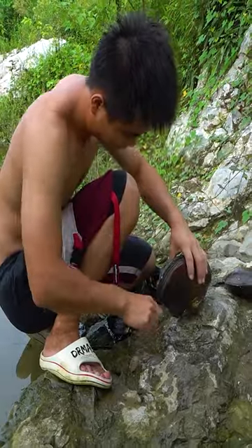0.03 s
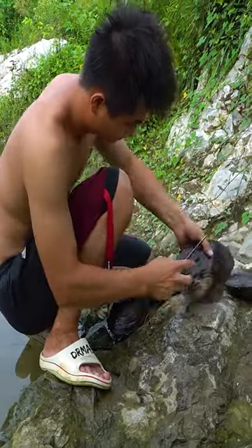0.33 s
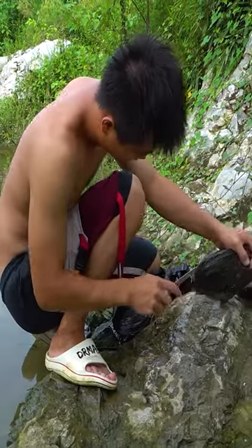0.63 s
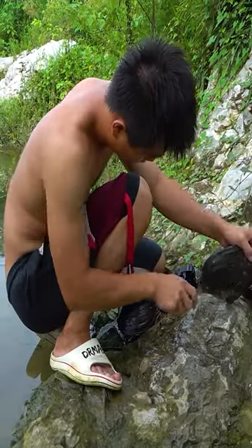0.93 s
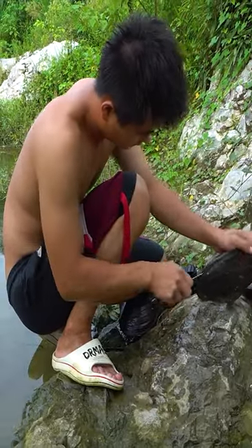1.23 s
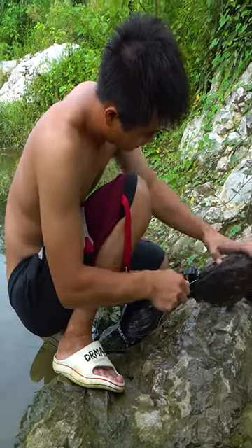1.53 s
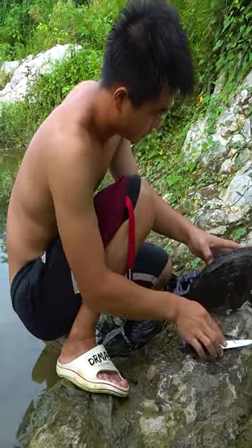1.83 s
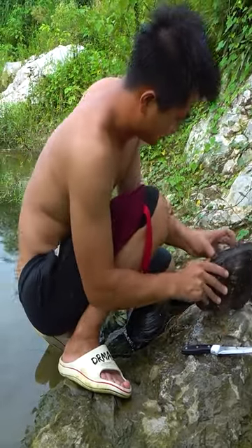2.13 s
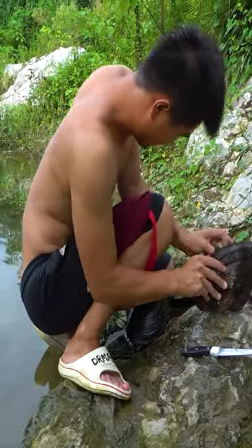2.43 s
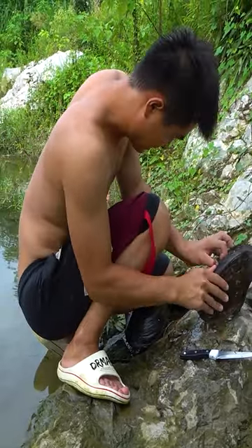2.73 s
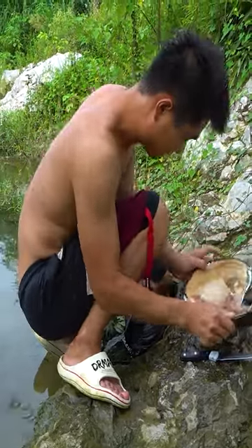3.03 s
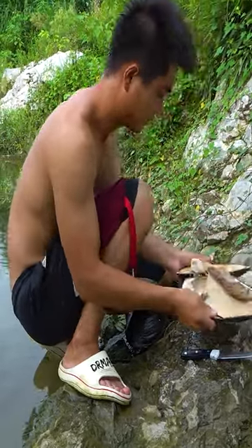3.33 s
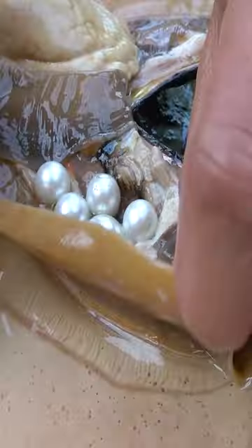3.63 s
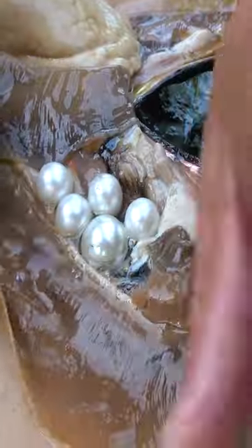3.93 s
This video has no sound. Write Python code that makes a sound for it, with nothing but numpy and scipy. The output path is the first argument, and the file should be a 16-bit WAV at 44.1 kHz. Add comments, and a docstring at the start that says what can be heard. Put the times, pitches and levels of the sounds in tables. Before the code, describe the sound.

A large mussel shell knocks hollowly on rock while a knife clicks and levers in its seam. The knife is put down, then the shell splits with a sharp crack and wet pops. Faint water and a bird sound behind.

```python
"""A big freshwater mussel is opened on a rock beside a pond. The closed shell knocks on the stone, a
knife levers in the seam and is laid down, then the halves part with a splintering crack and wet pops.
Each contact rings the modes of shell or knife and crushes grit; rocks and bank scatter the sound.
Behind it water hisses, laps and drips, a small bird sings one phrase twice and an insect chirps."""
import sys
import numpy as np
from scipy import signal
from scipy.fft import rfft, irfft
from scipy.io import wavfile
from scipy.ndimage import uniform_filter1d

SR = 44100
rng = np.random.default_rng(int(sys.argv[2]) if len(sys.argv) > 2 else 0)


def wav_out(sig):
    """Save sig, one row per channel (or a flat mono array), as 16-bit PCM at SR to the path in sys.argv[1]."""
    wavfile.write(sys.argv[1], SR, np.round(np.clip(np.atleast_2d(sig).T, -1, 1) * 32767).astype(np.int16))


N = 176400
TIME = np.arange(N) / SR


def from_db(db):
    """Decibels to gain."""
    return 10 ** (np.asarray(db) / 20)


def unit_rms(x):
    """Scale to rms 1."""
    return x / np.sqrt(np.mean(x ** 2) + 1e-20)


def decay(t, t60_s):
    """Exponential fall of 60 dB in t60_s."""
    return np.exp(-np.log(1000) * t / t60_s)


def add(out, start_s, sound, pan_db=0):
    """Mix a mono sound into a stereo track; pan is left minus right."""
    i = max(int(start_s * SR), 0)
    part = sound[:N - i]
    out[:, i:i + len(part)] += from_db([[pan_db / 2], [-pan_db / 2]]) * part


def stereo(mid, side, width):
    """Left and right from mid and side."""
    return np.array([mid + width * side, mid - width * side])


def colour(points):
    """Gain per FFT bin from (Hz, dB) points."""
    hz, db = np.transpose(points)
    bin_hz = np.maximum(np.arange(N // 2 + 1) * SR / N, 1)
    return from_db(np.interp(np.log(bin_hz), np.log(hz), db))


def noise(spectrum):
    """Steady coloured noise, rms 1."""
    return unit_rms(irfft(rfft(rng.standard_normal(N)) * colour(spectrum), N))


def band_swell(source, length_s, band_hz):
    """One band of a source, rising and falling once."""
    u = np.linspace(0, 1, int(length_s * SR))
    band = signal.sosfilt(signal.butter(2, band_hz, "band", fs=SR, output="sos"), source)
    return np.sin(np.pi * u) * unit_rms(band)[-len(u):]


def glides(rows, offset_s=0):
    """Soft-edged tones bending through three pitches; an optional rasp makes the pitch shiver."""
    out = np.zeros((2, N))
    for start_s, length_s, first_hz, mid_hz, last_hz, db, *rasp_hz in rows:
        u = np.linspace(0, 1, int(length_s * SR))
        shiver = unit_rms(uniform_filter1d(rng.standard_normal(N // 40), size=30))[:len(u)]
        bend_hz = np.polyval(np.polyfit([0, .5, 1], [first_hz, mid_hz, last_hz], 2), u)
        phase = 2 * np.pi * np.cumsum(bend_hz + sum(rasp_hz) * shiver) / SR
        add(out, offset_s + start_s, from_db(db) * np.sin(np.pi * u) ** 2 * np.sin(phase))
    return out


def echoes(x, db, t60_s, delay_s=0.003964):
    """Dense reflections from rough stone, dying smoothly."""
    t = TIME[:N // 8]
    envelope = decay(t, t60_s) * (t > delay_s)
    scatter = stereo(*rng.standard_normal((2, len(t))), width=0.23)
    response = scatter * envelope / np.sqrt(np.sum(envelope ** 2))
    return from_db(db) * signal.fftconvolve(x, response, axes=1)[:, :N]


# Stereo width of the hiss. Each row: frequency in Hz, side gain in dB ahead of the width factor.
HISS_SIDE = [(60, -21), (110, -24.5), (380, -8.5), (700, -4), (1300, -11.5), (2400, -9), (4400, -13.5),
             (8000, -29.5), (15000, -26)]
# Lean of the hiss. Each row: frequency in Hz, pan in dB.
HISS_PAN = [(60, -0.5), (200, 2.5), (700, -2.5), (1290, 6.5), (2380, 3.5), (4400, -1.5), (15000, 1)]


def hiss(spectrum, bands=12, flicker_db=2.5, step_s=.03):
    """Stereo noise whose bands flicker independently, the bass least."""
    mid = rfft(noise(spectrum))
    side = rfft(noise(spectrum)) * colour(HISS_SIDE)
    lean = np.sqrt(colour(HISS_PAN))
    bins = stereo(mid, side, width=0.76) * np.array([lean, 1 / lean])
    band_position = np.linspace(0, 1, N // 2 + 1) ** .5 * bands
    steps_s = np.arange(N // 100) * step_s
    out = 0
    for k in range(bands):
        flicker = np.interp(TIME, steps_s, rng.standard_normal(len(steps_s)))
        band = irfft(bins * np.maximum(1 - abs(band_position - k), 0), N)
        out = out + from_db(flicker_db * min(k / 2, 1) * flicker) * band
    return out


# Water spectra, before and after 3.6 s. Each row: frequency in Hz, relative density in dB.
WATER_SPECTRUM = [(18, -57), (30, -31), (106, -5), (245, -7.5), (311, -4), (461, -11.5), (760, -12),
                  (937, -7.5), (1250, -11.5), (2290, 3), (2750, -8), (3140, -3.5), (3490, -6.5),
                  (4780, -6.5), (6550, -13), (9220, -13), (12600, -20), (14800, -18), (16000, -21)]
LATE_WATER_SPECTRUM = [(30, -22), (70, -19), (130, 0.5), (300, -2), (450, -9), (700, -13.5), (1300, -9.5),
                       (1600, -1.5), (2100, 2), (2750, -5.5), (3500, -3.5), (5000, -12.5), (5600, -16),
                       (7500, -8.5), (10000, -13.5), (13000, -15), (16000, -21)]
# Water loudness. Each row: time in seconds, gain in dB.
WATER_GAIN = [(0, -50.5), (.7, -51.5), (1.4, -50.5), (2.2, -51.5), (2.9, -50), (3.1, -50), (3.55, -51.5),
              (3.62, -50.5), (4, -50)]


def running_water(switch_s=3.6):
    """Distant water hisses; its colour changes at 3.6 s."""
    gain = from_db(np.interp(TIME, *np.transpose(WATER_GAIN)))
    return gain * np.where(TIME < switch_s, hiss(WATER_SPECTRUM), hiss(LATE_WATER_SPECTRUM))


# Each row: start in seconds, length in seconds, level in dB, low and high band edge in Hz.
LAPS = [(1.471, 0.21, -54, 219, 412), (2.474, .22, -65, 490, 570), (2.681, .24, -62.5, 416, 480)]


def laps():
    """Water laps at the bank in low swells of narrow-band noise."""
    out = np.zeros((2, N))
    for start_s, length_s, db, *band_hz in LAPS:
        add(out, start_s, from_db(db) * band_swell(rng.standard_normal(N), length_s, band_hz))
    return out


# Each row: start in seconds, length in seconds, first, middle and last pitch in Hz, level in dB.
DRIPS = [(1.488, 0.025, 360, 352, 335, -47), (2.992, 0.024, 826, 570, 444, -39.5),
         (3.048, 0.012, 1080, 1126, 1150, -43.5), (3.115, 0.014, 1410, 1430, 1450, -49.5),
         (3.155, 0.03, 1400, 1430, 1430, -47)]


def drips():
    """Drips and bubbles ring as short gliding tones."""
    return glides(DRIPS)


# Each row: start in seconds, level in dB.
CHIRPS = [(3.7275, -51), (3.7395, -42), (3.7512, -38), (3.7637, -38)]


def insect(length_s=.009, pitches_hz=(15800, 14600, 13700)):
    """A quick, swelling run of thin falling chirps, smeared by the rocks."""
    run = glides([(start_s, length_s, *pitches_hz, db) for start_s, db in CHIRPS])
    return run + echoes(run, db=-7, t60_s=.09)


# Each row: start of a phrase in seconds.
PHRASES = [(1.046,), (2.494,)]
# Each row: offset and length in seconds, first, middle and last pitch in Hz, level in dB, rasp in Hz.
BIRD_NOTES = [(-.004, 0.049, 4850, 5046, 4750, -41.5, 30), (.056, 0.024, 4950, 4900, 5500, -43.5, 120),
              (.07, .036, 5600, 6600, 6240, -49, 400), (.11, .028, 4800, 4560, 4330, -46.5, 50)]


def bird():
    """A small bird repeats four raspy whistled notes, with a short echo."""
    song = sum(glides(BIRD_NOTES, start_s) for start_s, in PHRASES)
    return song + echoes(song, db=-11.5, t60_s=.14)


# Crackle loudness. Each row: time in seconds, level in dB.
CRACKLE_LEVEL = [(0, -61.5), (.9, -59.5), (1.5, -64), (2.04, -59.5), (2.3, -63), (2.93, -62), (2.99, -45.5),
                 (3.07, -57), (3.15, -63.5), (3.32, -56.5), (3.5, -60.5), (4, -59.5)]


def wet_crackle(bursts_per_s=2200, size_spread_db=2, t60_cycles=22, range_hz=(1880, 11930), pitches=16):
    """Tiny water films on flesh and fingers burst at random, each ringing briefly."""
    sizes = from_db(size_spread_db * np.minimum(rng.exponential(1, N), 5)) * rng.choice([-1, 1], N)
    bursts = sizes * (rng.random(N) < bursts_per_s / SR)
    pitch_index = rng.integers(0, pitches, N)
    out = 0
    for k, hz in enumerate(np.geomspace(*range_hz, pitches)):
        radius, angle = decay(1 / SR, t60_cycles / hz), 2 * np.pi * hz / SR
        resonator = [np.sin(angle), 0, -np.sin(angle)], [1, -2 * radius * np.cos(angle), radius ** 2]
        out = out + signal.lfilter(*resonator, bursts * (pitch_index == k) + 1e-18)
    return from_db(np.interp(TIME, *np.transpose(CRACKLE_LEVEL))) * unit_rms(out)


# Each row: start in seconds, length in seconds, level in dB, low and high band edge in Hz.
SCRAPES = [(.875, .06, -57, 13000, 15800), (1.179, 0.033, -47.5, 6100, 8000),
           (1.66, 0.011, -50.5, 7600, 8300), (2.165, .05, -59, 11000, 15500),
           (2.365, .07, -60, 9500, 15500), (2.638, .03, -56, 11000, 14000),
           (0.397, 0.0059, -43, 10500, 15800)]


def scrapes(slips_per_s=570):
    """Short strokes over fine grit give a bright spray of tiny slips."""
    out, size = np.zeros((2, N)), N // 10
    for start_s, length_s, db, *band_hz in SCRAPES:
        slips = rng.choice([-1, 1], size) * (rng.random(size) < slips_per_s / SR)
        add(out, start_s, from_db(db) * band_swell(slips + 1e-18, length_s, band_hz))
    return out


# Wet pops and dull taps. Each row: start in seconds, level in dB, pitch in Hz, t60 in cycles, pan in dB.
POPS = [(1.3993, -26, 840, 2.9, 0), (1.798, -31, 1500, 5.6, 3), (1.7992, -26, 760, 4.9, 2),
        (2.7542, -30, 2450, 29, 1), (2.7552, -28, 8400, 52, 1), (3.5114, -9, 3930, 7.3, 1),
        (3.5127, -10.5, 2190, 12.3, 3.5), (3.5125, -24, 950, 5.4, 0), (3.5748, -20.5, 3080, 18, -4),
        (3.5747, -32, 1190, 4, 0.5)]


def flesh_pops(rise_cycles=0.77):
    """A small cavity swells into a few cycles and dies at once."""
    out, t = np.zeros((2, N)), TIME[:N // 40]
    for start_s, db, hz, t60_cycles, pan_db in POPS:
        envelope = (1 - np.exp(-t * hz / rise_cycles)) * decay(t, t60_cycles / hz)
        add(out, start_s, from_db(db) * envelope / envelope.max() * np.sin(2 * np.pi * hz * t), pan_db)
    return out


def ring(t, modes, pitch_ratio=1, treble_db=0, treble_hz=3000, spread_db=2, detune=.012):
    """A struck body; mode strengths and treble tuning vary with the point of contact."""
    out = 0
    for k, (hz, db, t60_s) in enumerate(modes):
        strength, shift = rng.standard_normal(2)
        is_treble = hz > treble_hz
        gain = (-1) ** k * from_db(db + spread_db * strength + is_treble * treble_db)
        tuned_hz = hz * pitch_ratio * (1 + is_treble * detune * shift)
        out = out + gain * decay(t, t60_s) * np.sin(2 * np.pi * tuned_hz * t)
    return out


# Each row: frequency in Hz, relative density in dB.
GRIT_SPECTRUM = [(300, -26), (1000, -5.5), (2000, -2.5), (4000, -0.5), (6000, 1.5), (8500, 2.5),
                 (12000, -0.5), (16000, -2.5)]


def contacts(rows, modes, rise_s, clump_db=4, tail_db=-24):
    """Each contact rings the body and crushes grit, whose uneven grains break one after another."""
    out, t = np.zeros((2, N)), TIME[:N // 24]
    clumps = unit_rms(uniform_filter1d(rng.standard_normal(N), size=16))
    grit = unit_rms(noise(GRIT_SPECTRUM) * from_db(clump_db * np.tanh(clumps)))
    crush = .5 * (decay(t, t60_s=0.013) + from_db(tail_db) * decay(t, t60_s=0.058))
    attack = 1 - np.exp(-t / rise_s)
    for start_s, ring_db, grit_db, pan_db, *tone in rows:
        body = from_db(ring_db) * ring(t, modes, *tone)
        crunch = from_db(grit_db) * crush * np.roll(grit, -int(start_s * SR))[:len(t)]
        add(out, start_s, (body + crunch) * attack, pan_db)
    return out


# Closed shell. Each row: frequency in Hz, gain in dB, t60 in seconds.
CLOSED_MODES = [(530, -15, 0.019), (734, -14, 0.0046), (950, .5, 0.027), (1260, -27, 0.005),
                (1650, -13, 0.013), (4100, -19, 0.021), (6060, -23, 0.018)]
# Each row: start in seconds, length in seconds, level in dB.
DRAGS = [(0.099, 0.11, -56), (.46, 0.14, -58), (0.737, 0.052, -54.5), (0.868, 0.073, -60.5),
         (1.012, 0.11, -58.5), (1.12, 0.034, -46.5), (1.174, 0.055, -48)]


def shell_drags(slips_per_s=1300):
    """Dense little slips on the stone keep the closed shell murmuring."""
    out, t = np.zeros((2, N)), TIME[:N // 40]
    body = sum(from_db(db) * np.sin(2 * np.pi * hz * t) * decay(t, t60) for hz, db, t60 in CLOSED_MODES)
    slips = rng.standard_normal(N) * (rng.random(N) < slips_per_s / SR)
    rub = unit_rms(signal.fftconvolve(slips, body)[:N])
    for start_s, length_s, db in DRAGS:
        u = np.linspace(0, 1, int(length_s * SR))
        add(out, start_s, from_db(db) * np.sin(np.pi * u) * np.roll(rub, -int(start_s * SR))[:len(u)])
    return out


# Each row: start in seconds, ring gain, grit gain and pan in dB, pitch ratio.
KNOCKS = [(.1315, -28, -26, 3, 1.02), (.139, -32, -52, 0, 1.04), (.1502, -25, -25.5, 0, 0.98),
          (.1772, -29.5, -48, 0, 0.98), (.2135, -27, -36, 1.5, 1.05), (.225, -31.5, -36, -2, 0.96),
          (.3995, -20.5, -34, 1.5, 0.99), (.4485, -22, -32, -2.5, 0.95), (.459, -33.5, -56, -6, 1),
          (.644, -44.5, -63, 8, 0.99), (.760, -42, -29.5, 1, 1.22), (.877, -38.5, -38, 0, 0.94),
          (.904, -37.5, -35, 3, 1.03), (1.017, -41, -57, 3, 1.08), (1.191, -41, -35, 4, 1.01),
          (1.2045, -40, -30.5, 0, 0.98)]


def shell_knocks():
    """The closed shell knocks on the rock and rings hollow."""
    return contacts(KNOCKS, CLOSED_MODES, rise_s=.00051)


# Each row: frequency in Hz, gain in dB, t60 in seconds.
KNIFE_MODES = [(1500, -21, 0.01), (2460, -14, 0.017), (3300, -14, 0.011), (3650, -10.5, 0.036),
               (4040, -7.5, 0.018), (4500, -8, 0.023), (5430, -11.5, 0.014), (6180, -6, 0.014),
               (10250, -12, 0.012), (13300, -15, .01), (14700, -16, 0.0087)]
# Each row: start in seconds, ring gain, grit gain and pan in dB.
KNIFE_CLICKS = [(.211, -28.5, -19, -2.5), (.214, -50, -27, 2), (1.8587, -23, -18, -2), (1.862, -54, -24, 0),
                (1.8685, -28, -37, -1), (1.8735, -37, -45, 4), (1.8977, -31, -27.5, -2.5),
                (1.9075, -36, -44, -1), (1.918, -30.5, -36, -4), (1.9235, -36, -42, 2),
                (1.928, -38, -48, -4), (1.944, -42, -55, -5), (1.9715, -40, -50, 0), (1.9775, -35, -47, -4)]


def knife_clicks():
    """The knife clicks on shell and stone, and bounces as it is laid down."""
    return contacts(KNIFE_CLICKS, KNIFE_MODES, rise_s=.0001)


def blade_ring(start_s=.212, db=-49, hz=3560, t60_s=0.28):
    """One thin steel mode rings on after the first click."""
    out, t = np.zeros((2, N)), TIME[:N // 16]
    add(out, start_s, from_db(db) * np.sin(2 * np.pi * hz * t) * decay(t, t60_s))
    return out


# Each row: start in seconds, length in seconds, first, middle and last pitch in Hz, level in dB.
SQUEAKS = [(1.2, 0.013, 6350, 6130, 5900, -42)]


def blade_squeak():
    """The blade squeaks in the seam with a falling pitch."""
    return glides(SQUEAKS)


# Each row: frequency in Hz, gain in dB, t60 in seconds.
SEAM_MODES = [(667, -13, 0.016), (1066, -5, 0.024), (1400, -11.5, 0.021), (1680, -6, 0.03),
              (1898, 0, 0.019), (2450, -6.5, 0.016), (4250, -23, .03), (6520, -14, 0.012)]
# Each row: start in seconds, ring gain, grit gain and pan in dB.
LEVERS = [(1.369, -37, -52, -2), (1.377, -32, -43, 6), (1.3825, -29, -56, 4), (1.393, -34, -40, 14),
          (1.3965, -25, -20.5, -4), (1.398, -19, -25, 1), (1.411, -37, -57, -2), (2.013, -37, -52, 3),
          (2.017, -27, -42, 2.5), (2.021, -44, -25, 1.5), (2.027, -26, -32, 0), (2.032, -29, -43, -1)]


def levering():
    """The blade levers in the seam and the hands work the rim."""
    return contacts(LEVERS, SEAM_MODES, rise_s=.001)


# Open halves. Each row: frequency in Hz, gain in dB, t60 in seconds.
OPEN_MODES = [(618, -24, 0.04), (935, -16, 0.031), (1150, -16.5, 0.017), (2314, -12.5, 0.022),
              (2500, -8, 0.048), (2690, -12, 0.022), (2860, -16, .025), (3370, -15, 0.015),
              (3550, -13, 0.027), (3760, -8, 0.021), (3990, -5, 0.016), (4180, -9, 0.016),
              (4750, -15.5, 0.028), (5550, -18, 0.01), (7400, -18.5, 0.019)]
# Each row: start in seconds, ring gain, grit gain and pan in dB, pitch ratio, treble ring gain in dB.
CRACKS = [(2.7541, -59, -28.5, 2.5, 1, 0), (2.9362, -27, -32, 0, 1.02, -14),
          (2.9457, -13, -16, 2.5, 0.98, -12), (2.949, -33, -10.5, -4, 0.98, 0),
          (2.9537, -24, -14.5, -1, 1.03, 2), (2.9594, -14.5, -11, -3.5, 0.98, 5),
          (2.9612, -11, -16, -4, 1, 5), (2.9685, -13, -26, 0, 1, 2), (2.9772, -28, -23, -4, 1.02, -1.5),
          (3.002, -50, -35, -7, 0.88, 0), (3.015, -36, -39, -4, .96, -4), (3.048, -43, -37, -2, .97, 0),
          (3.311, -38, -31.5, 3, 1, -10), (3.324, -61, -35.5, 5, 1, 0)]


def shell_cracks():
    """The halves split apart in a run of fractures."""
    return contacts(CRACKS, OPEN_MODES, rise_s=.0001)


def scene(low_cut_hz=344):
    """The work on the mussel with its near and far echoes, over the pond."""
    work = shell_knocks() + levering() + knife_clicks() + shell_cracks()
    work += shell_drags() + scrapes() + blade_squeak() + blade_ring() + flesh_pops()
    # Small bodies radiate little bass.
    work = signal.sosfilt(signal.butter(2, low_cut_hz, "high", fs=SR, output="sos"), work)
    rocks = echoes(work, db=-9.5, t60_s=0.035)
    bank = echoes(work, db=-23.5, t60_s=0.39)
    pond = bird() + laps() + running_water() + drips() + insect()
    return work + rocks + bank + wet_crackle() + pond


def record(dry, cutoff_hz=16000):
    """A steep low-pass cuts the top."""
    return signal.sosfilt(signal.ellip(10, .1, 80, cutoff_hz, fs=SR, output="sos"), dry)


dry = scene()
out = record(dry)
wav_out(out)
```